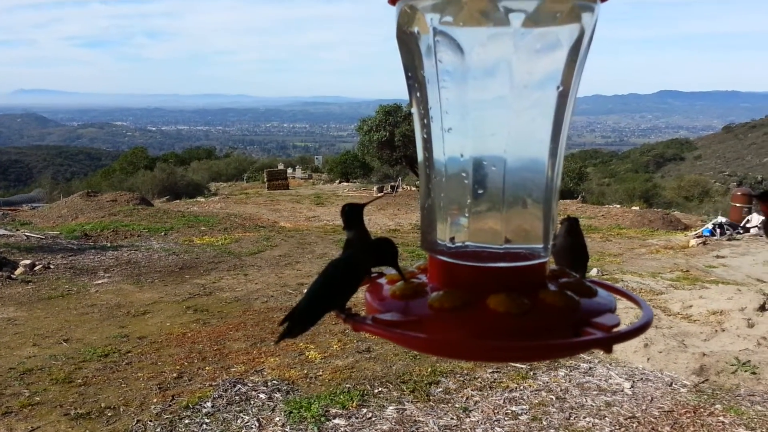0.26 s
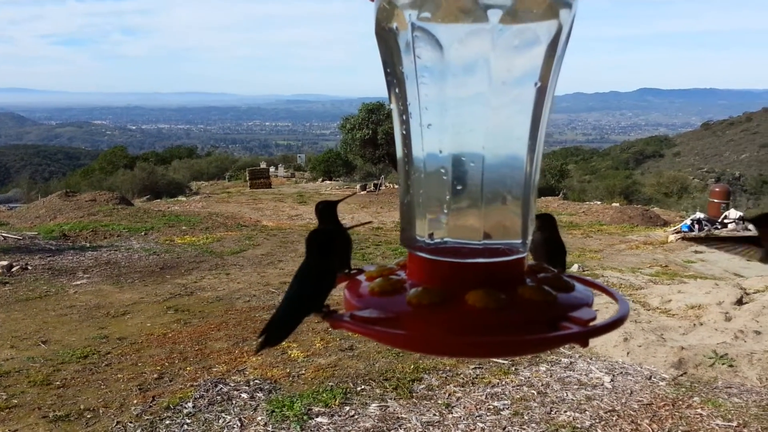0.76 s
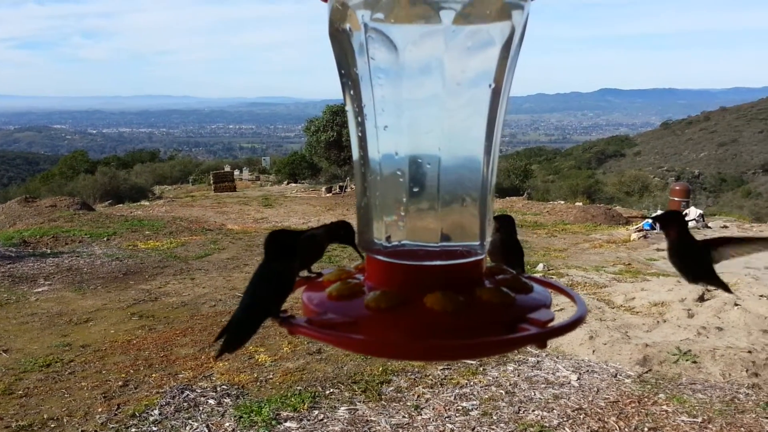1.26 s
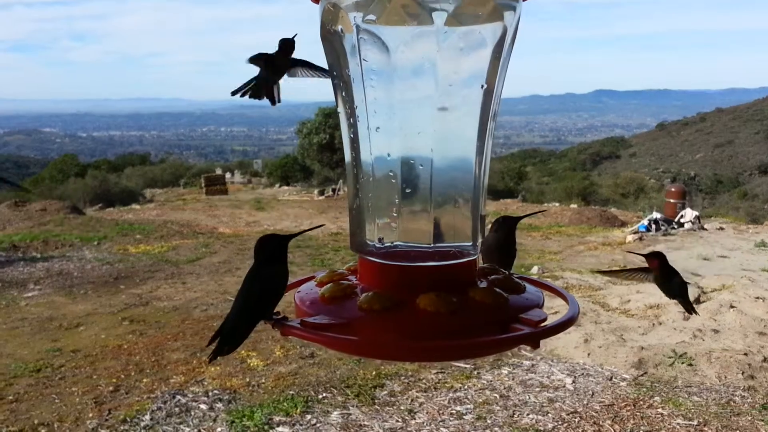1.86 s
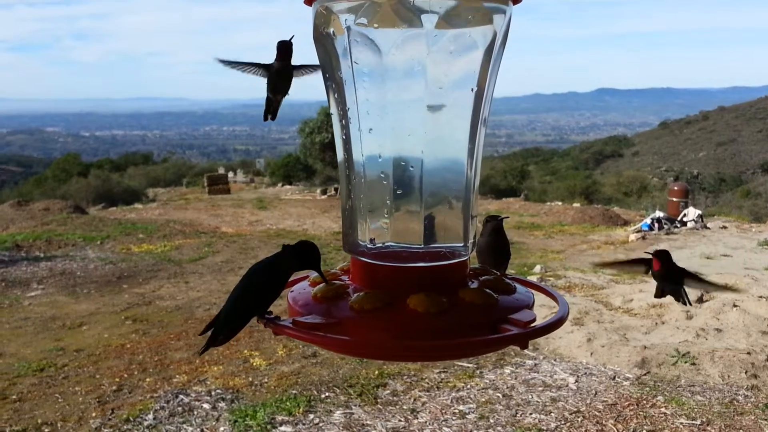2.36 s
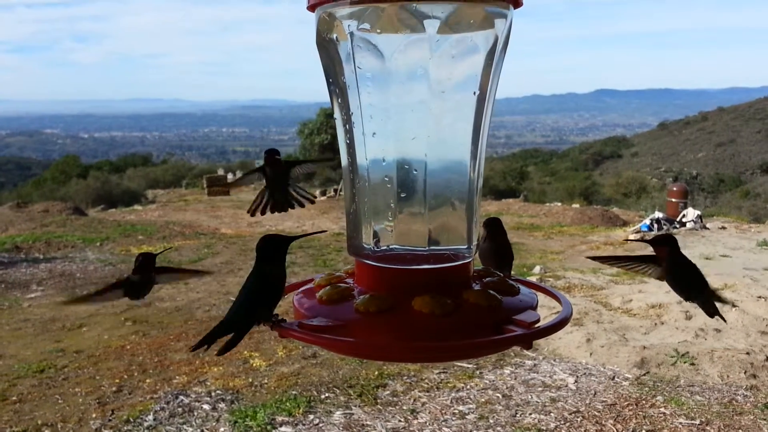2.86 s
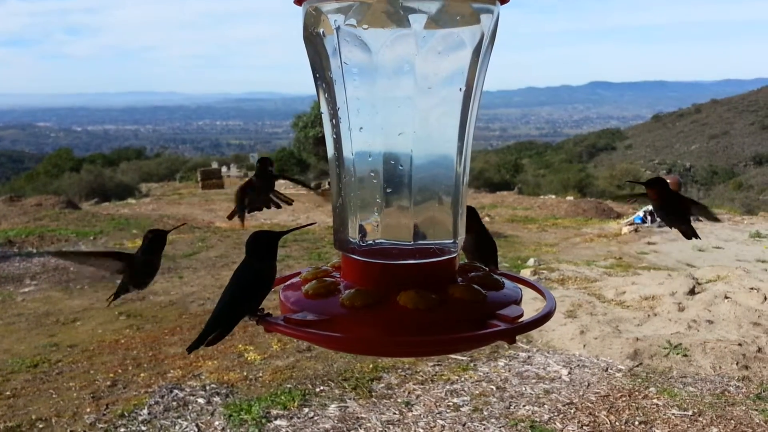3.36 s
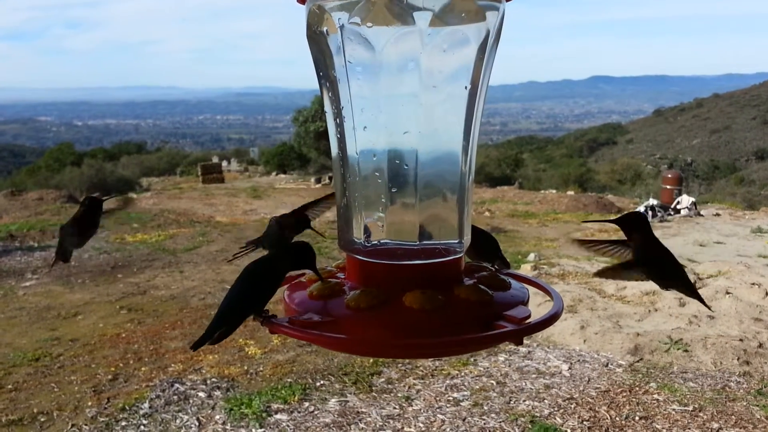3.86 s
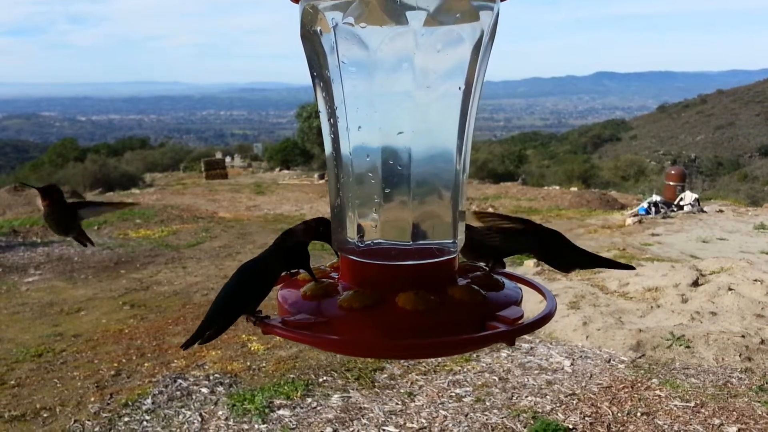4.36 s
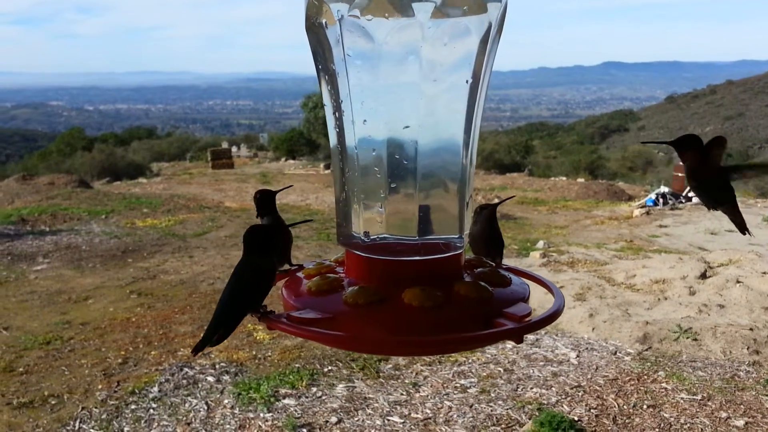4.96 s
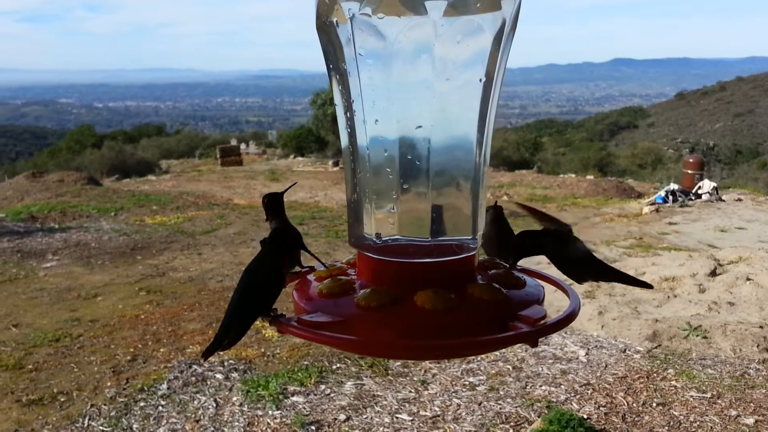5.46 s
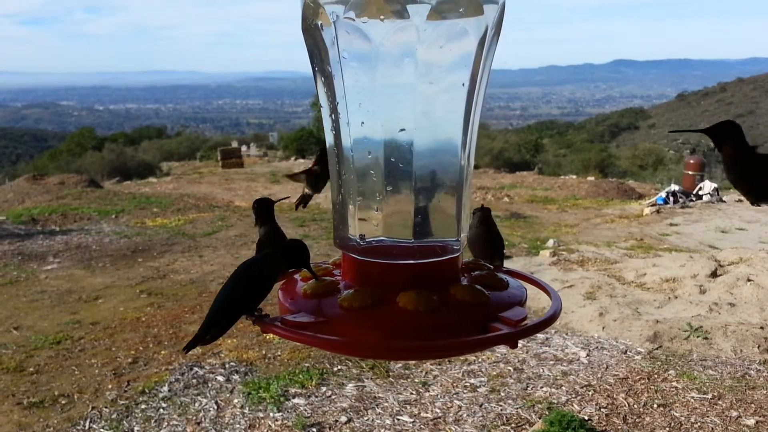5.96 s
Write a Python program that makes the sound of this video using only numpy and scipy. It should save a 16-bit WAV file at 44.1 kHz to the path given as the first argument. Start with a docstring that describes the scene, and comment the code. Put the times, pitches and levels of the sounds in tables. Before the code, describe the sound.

Very close outdoors at a nectar feeder, several hummingbirds hover with a low, pulsing purr of wings. Loud, needle-sharp chips, each a tiny falling whistle with a brief echo, strike irregularly throughout, mixed with much fainter ones. Darting birds add quick, throaty wing flutters and feather rush. Faint scratchy hiss notes appear around two seconds, over quiet open air.

```python
"""Piercing chips burst out over the purr of wings: hummingbirds crowd a nectar feeder outdoors, close by.
Each chip is a whistle that plunges in about 10 ms and echoes off the feeder and nearby walls; a brief
low tone ends the first one. Two hovering birds hum as wingbeat harmonics at different rates; a darting
bird adds harder strokes and bands of noise for the rush of air in its feathers.
Scratchy notes of rattled hiss, a faint 3 kHz sine whistle and open air lie underneath."""
import sys
import numpy as np
from scipy import signal
from scipy.fft import rfft, irfft, next_fast_len
from scipy.io import wavfile
from scipy.ndimage import map_coordinates

SR = 44100
rng = np.random.default_rng(int(sys.argv[2]) if len(sys.argv) > 2 else 0)


def pcm_store(signal):
    """Save signal as 16-bit PCM."""
    levels = np.round(np.clip(np.atleast_2d(signal), -1, 1) * 32767)
    wavfile.write(sys.argv[1], SR, levels.astype(np.int16).T)


N = 273420

# Open air. Each row: frequency in Hz, relative density in dB per Hz.
AIR_SPECTRUM = [(20, -46), (30, -36), (45, -19), (60, -5), (90, -9), (114, 0.5), (166, -10.5), (349, -17.5),
                (600, -24), (934, -26.5), (4260, -47.5), (7650, -52), (14500, -47.5)]
DRONE_HZ, DRONE_DB = 343.5, -61

# Hum of a hovering bird. Each row: frequency in Hz, relative level of a wingbeat harmonic there in dB.
HUM_SPECTRUM = [(30, -34), (50, -18.5), (78, -10), (100, 2.5), (125, -1.5), (170, -9), (260, -10.5),
                (500, -33.5), (1000, -73)]
# Nearness of the hovering birds. Each row: time in seconds, hum level in dB before a common trim.
NEARNESS = [(0.08, -52), (0.28, -45), (1.05, -52.5), (1.3, -47.5), (1.85, -42.5), (2.3, -48), (3.45, -46.5),
            (3.95, -41.5), (4.2, -47.5), (4.62, -43.5), (5.4, -48), (5.8, -46.5), (6.2, -43)]
# Wingbeats of the two hovering birds. Each row: time in seconds, beats per second.
QUICK_BEATS = [(0, 50.5), (1.2, 47), (1.9, 52.5), (3.7, 47), (4.3, 54), (4.8, 49), (6.2, 51)]
SLOW_BEATS = [(0, 39.46), (0.55, 39.5), (1.2, 43.17), (2.3, 40.33), (3.5, 38.4), (3.8, 42.84), (5.2, 44.7),
              (6.2, 42.36)]

# The brief low tone that ends the first chip, then a faint 3 kHz whistle. Each row: start in seconds,
# length in seconds, level in dB, pitch at both ends in Hz, rise to the middle in Hz.
ARCHED_TONES = [(0.136, 0.0052, -40, 1900, 450), (0.594, 0.1, -58.5, 2910, 246)]
# Scratchy notes between the chips. Each row: start in seconds, length in seconds, level in dB,
# centre of the band in Hz.
RASP_NOTES = [(2.097, 0.21, -54, 7050), (2.211, 0.081, -52, 7100), (2.348, 0.086, -50, 7030),
              (2.781, 0.13, -54.5, 5420), (2.86, 0.097, -56, 5800)]

# Wing push of the darting bird, for both strokes and eddies. Each row: frequency in Hz, relative level in dB.
PUSH_SPECTRUM = [(20, -29), (35, -21), (55, -9), (120, -3), (210, 3.5), (300, -3.5), (450, -8.5),
                 (700, -19.5), (1200, -34.5), (3000, -61)]
# Air through the wing feathers. Each row: frequency in Hz, relative density in dB per Hz.
SWISH_SPECTRUM = [(200, -30), (500, -7.5), (800, -2), (1300, -2), (2500, -7), (5000, -16.5), (9000, -8),
                  (14000, -17)]
# Rush of the fanned tail. Each row: frequency in Hz, relative density in dB per Hz.
TAIL_SPECTRUM = [(1000, -8), (3000, -18.5), (5000, -3), (6500, -1), (9000, -8), (14000, -19)]
# Darts and sharp turns. Each row: middle in seconds, half length in seconds, then the levels in dB,
# before the mix trims, of wing push, feather swish and fanned tail.
TURNS = [(0.122, .02, -45.5, -62, -70.5), (0.597, .025, -44.5, -61.5, -63),
         (0.734, .035, -39.5, -57.5, -61.5), (1.31, .05, -43.5, -60, -75.5),
         (1.612, 0.032, -38.5, -60.5, -45), (1.694, .055, -36.5, -51.5, -53), (1.806, 0.022, -42, -45, -59),
         (1.944, .035, -47.5, -62.5, -58), (2.486, .025, -41, -51, -53.5),
         (2.617, .04, -37.5, -54.5, -69.5), (2.841, .05, -35.5, -52.5, -46.5),
         (3.148, .03, -46, -59.5, -57), (3.25, 0.02, -39.5, -56, -53.5), (3.354, .025, -48.5, -57.5, -74.5),
         (3.772, .17, -44, -56.5, -69.5), (4.585, .06, -42, -56.5, -51.5), (4.827, 0.06, -46.5, -61, -61.5),
         (5.332, .045, -43.5, -55.5, -72), (5.491, .04, -46, -61, -64), (5.717, 0.023, -40, -54, -51.5),
         (5.811, .03, -36.5, -57, -52)]
TURN_EDGE = 1.8  # exponent: 2 is a bell-shaped swell, less is more pointed
CRUISE_PUSH_DB, CRUISE_SWISH_DB = -53, -67.5  # between turns, before the mix trims
CRUISE_HZ = 49.48  # beats per second between turns
EFFORT_HZ_PER_DB = -0.35  # harder strokes come more slowly

# Chips. Each row: start in seconds, level in dB before a slight trim, starting pitch in Hz,
# nominal length in seconds, boost of the low ending in dB, boost of the octave in dB before a trim,
# left over right level in dB, phase lead of left over right in radians.
CHIP_CALLS = [(0.122, -0.5, 9010, 0.012, 4, 3.5, -4.5, 3), (0.6028, -0.55, 8875, 0.015, -4, -0.5, -3, 3),
              (0.795, -23, 9620, 0.0088, 6, 6.5, -6, -1), (1.189, -1, 8746, 0.012, -2, 2, 1.5, -0.7),
              (1.349, -29, 9120, 0.0056, 9, 4, -8.5, -1.1),
              (1.771, -1.5, 9020, 0.013, 4.5, 1.5, -3.5, -1.5), (1.94, -22, 8930, 0.0087, 7.5, 2, -4.5, 2),
              (2.1525, -4, 9090, 0.013, -2.5, 5, -2, -0.5),
              (2.4605, -1.5, 9050, 0.011, -1.5, 4.5, 0, -0.65),
              (2.537, -3.5, 8600.0, 0.012, 0, 3, -3.5, -1), (2.653, -20.0, 9140, 0.01, 3.5, 4, -8.5, 2),
              (2.708, -31, 7220, 0.009, 12.5, 13, -3, 3), (3.157, -29, 8290, 0.0047, 0.5, 6, -8, -1.3),
              (3.273, -1.5, 9184, 0.016, 2.5, 2, -2.5, -2), (3.477, -24, 7760, 0.0044, 16, 10.5, -2, 3.5),
              (3.589, -23, 8290, 0.0056, -3, 5, -3, 0), (3.6986, -1.0, 9170, 0.014, -4.5, 0, -0.5, -1.5),
              (3.7927, -4, 8430, 0.0098, 3, 5, -4.5, -0.5),
              (3.938, -27.5, 8670, 0.0065, 19, 18.5, -1, -0.3),
              (4.259, -34.5, 8570, 0.0082, 9, 5.5, -4, 3.5), (4.6337, -2, 8830, 0.012, 1.5, 4, -7.5, 2.5),
              (4.7397, -21.5, 8880, 0.0066, 7, 8, -7, -1), (5.176, -4.5, 9270, 0.0105, 8, 3.5, 1.5, -0.5),
              (5.291, -6, 8930, 0.013, 8, 7, 3, -0.4), (5.4568, -26, 8480, 0.005, 7, 4, 3.5, 3)]
# Course of one chip. Each row: share of its nominal length, fundamental in dB, octave in dB before boosts.
CHIP_COURSE = [(-.3, -48.5, -75.5), (-.05, -41, -61), (0.077, -19, -63.5), (0.349, -8.5, -53.5),
               (.6, -2.5, -35.5), (0.802, -7, -23.5), (0.999, -29.5, -24), (1.202, -48, -49)]
# Nearby surfaces. Each row: typical echo delay in seconds, echo level in dB.
WALLS = [(.0013, -10.5), (.0028, -15.5), (.0058, -13), (0.012, -16.5)]
# Diffuse tail. Each row: frequency in Hz, time to decay by 60 dB in seconds.
YARD_DECAY = [(300, .2), (4000, 0.36), (7500, 0.19), (10500, 0.28), (13000, 0.26)]

# Resonances of the two microphone ports. Each row: frequency in Hz, left gain in dB, right gain in dB,
# phase lead of left over right in radians.
PORTS = [(100, 0.85, 0.32, 0.5), (2550, 2.5, 0.5, 1.08), (4600, 5, 0, -1.45), (6350, 0.5, -6.5, -0.57),
         (6840, -0.5, -0.5, -2.13), (7700, -1.5, 5, -0.72), (8270, -5, 5.5, -0.05), (9200, 2.5, -0.5, 2.5),
         (10000, -1, 4.5, 1.5), (11000, 1, 1.5, 3), (14460, 3, 2, 3)]
TOP_HZ = 14700  # upper band limit


def amp(db):
    """Decibels to gain."""
    return 10 ** (np.asarray(db) / 20)


def unit(x):
    """Scale to rms 1."""
    return x / np.sqrt(np.mean(x ** 2) + 1e-20)


def along(points, hz):
    """Read (Hz, value) points along a log frequency axis."""
    f, v = np.transpose(points)
    return np.interp(np.log(hz + 1), np.log(f + 1), v)


def curve(rows):
    """Draw (seconds, value) points as one value per sample."""
    s, values = np.transpose(rows)
    return np.interp(np.arange(N) / SR, s, values)


def wobble(rate):
    """A smooth random curve through `rate` knots a second."""
    knots = rng.standard_normal(int(N * rate / SR) + 4)
    fine = np.arange(0, len(knots) - 1, .1)
    smooth = map_coordinates(knots, [fine])
    return np.interp(np.arange(N) * rate / SR, fine, smooth)


def filtered(x, response):
    """Shape x by a response of frequency."""
    m = next_fast_len(N + SR // 2)
    return irfft(rfft(x, m) * response(np.fft.rfftfreq(m, 1 / SR)), m)[..., :N]


def panned(left_db):
    """Left and right gains of unit mean power, left_db apart."""
    return unit(amp(np.array([[left_db], [-left_db]]) / 2))


def noise(spectrum, side_db):
    """Coloured stereo noise of rms 1; more side makes it wider."""
    mid, side = filtered(rng.standard_normal((2, N)), lambda hz: amp(along(spectrum, hz)))
    side = amp(side_db) * side
    return unit(np.array([mid + side, mid - side]))


def beat_phase(rate_hz, unsteady):
    """Phase in radians of a slightly unsteady beat."""
    cycles = np.cumsum(rate_hz * (1 + unsteady * wobble(14))) / SR
    return 2 * np.pi * (cycles + rng.random())


def wing_tone(rate_hz, spectrum, unsteady, flutter_db, spread, count=18):
    """Wingbeat harmonics, each wavering in level; a small phase spread (radians) makes sharp strokes."""
    phase = beat_phase(rate_hz, unsteady)
    mean_hz = np.mean(rate_hz)
    tone = np.zeros(N)
    for k in range(1, count + 1):
        level_db = along(spectrum, k * mean_hz) + flutter_db * wobble(9)
        tone += amp(level_db) * np.cos(k * phase + spread * rng.standard_normal())
    return unit(tone), phase


def background():
    """Open air as gently drifting low noise, a thin hiss and a faint drone wavering in level."""
    air = amp(-54.0 + wobble(7)) * noise(AIR_SPECTRUM, side_db=-10.5)
    hiss_spectrum = [(500, -8), (3000, -5.0), (7500, -11), (10000, 1), (14000, 3.0)]  # Hz, dB per Hz
    hiss = amp(-72.0) * noise(hiss_spectrum, side_db=5.0)
    drone = amp(DRONE_DB + 3 * wobble(2)) * np.sin(beat_phase(DRONE_HZ, unsteady=.004))
    return air + hiss + drone


def hovering():
    """Two birds hang by the feeder; their hums beat against each other and swell as they shift about."""
    hum_db = curve(NEARNESS) + 1.6 * wobble(14)
    quick, _ = wing_tone(curve(QUICK_BEATS), HUM_SPECTRUM, unsteady=.03, flutter_db=3.0, spread=1.5)
    slow, _ = wing_tone(curve(SLOW_BEATS), HUM_SPECTRUM, unsteady=.025, flutter_db=0.55, spread=1.8)
    return amp(hum_db - 2.5) * (quick * panned(.9) + slow * panned(-.4))


def arched_tones():
    """The first chip's low end tone and the 3 kHz whistle: sines that rise and sink in pitch and level."""
    out = np.zeros(N)
    for s, length, db, base_hz, rise_hz in ARCHED_TONES:
        arch = np.sin(np.pi * np.clip((np.arange(N) / SR - s) / length, 0, 1))
        phase = 2 * np.pi * np.cumsum(base_hz + rise_hz * arch) / SR
        out += amp(db) * np.sqrt(np.abs(arch)) * np.sin(phase)
    return out


def rasps(width_hz=1700):
    """Soft scratchy notes: a band of hiss chopped by a fast rattle of the syrinx."""
    t, out = np.arange(N) / SR, np.zeros((2, N))
    rattle = unit(amp(3.6 * np.cos(beat_phase(1200, unsteady=.12))))
    for s, length, db, centre_hz in RASP_NOTES:
        band = filtered(rng.standard_normal((2, N)),
                        lambda hz: 1 / (1 + (np.abs(hz - centre_hz) / width_hz) ** 4))
        # a quiet remnant of each band stays on outside its note
        swell = np.interp((t - s) / length, [0, .12, .6, 1.15], [0.081, 1.0, 1.0, 0.081])
        out += amp(db) * swell * rattle * unit(band)
    return out


def darting():
    """In every turn the wings beat harder and slower, and air rushes through the feathers on each stroke."""
    middle, width, *levels_db = np.transpose(TURNS)
    distance = np.abs((np.arange(N) / SR - middle[:, None]) / width[:, None])
    swells = np.exp(-distance ** TURN_EDGE)
    push_power, swish_power, tail_power = amp(levels_db) ** 2 @ swells
    push = np.sqrt(amp(CRUISE_PUSH_DB) ** 2 + push_power)
    swish = np.sqrt(amp(CRUISE_SWISH_DB) ** 2 + swish_power)

    effort_db = 20 * np.log10(push) - CRUISE_PUSH_DB
    rate_hz = CRUISE_HZ + EFFORT_HZ_PER_DB * effort_db
    tone, phase = wing_tone(rate_hz, PUSH_SPECTRUM, unsteady=0.032, flutter_db=3.0, spread=0.9)
    force = unit(amp(1.1 * wobble(30)))  # strokes differ in force as the bird steers
    # feathers rustle unevenly within a stroke
    stroke = unit(force * amp(1.6 * np.cos(phase) + 2.3 * wobble(170)))

    beats = amp(-3.0) * push * force * tone * panned(1.8)
    eddies = amp(-4.5) * push * noise(PUSH_SPECTRUM, side_db=-13.5) * panned(2.5)
    wing_feathers = swish * noise(SWISH_SPECTRUM, side_db=2.5) * panned(4)
    fanned_tail = np.sqrt(tail_power) * noise(TAIL_SPECTRUM, side_db=-3.5)
    return beats + stroke * (eddies + wing_feathers + fanned_tail)


def breath(order, edges_hz, kind, count):
    """Filtered stereo noise, independent left and right, to roughen a chip."""
    sos = signal.butter(order, edges_hz, kind, fs=SR, output="sos")
    return signal.sosfilt(sos, rng.standard_normal((2, SR // 10)))[:, :count]


def chip(start_hz, length, ending_db, bright_db, lead, end_hz=4200, bend=2.14, rough_db=-2,
         break_db=3.5, break_hz=1100, hiss_db=-32):
    """A slightly hissy whistle creeps in, then falls ever faster; low down it breaks up over a rough octave."""
    share, first_db, octave_db = np.transpose(CHIP_COURSE)
    u = np.arange(share[0], share[-1], 1 / (length * SR))
    pitch_hz = start_hz - (start_hz - end_hz) * np.maximum(u, 0) ** bend
    phase = 2 * np.pi * np.cumsum(pitch_hz) / SR
    ports = np.array([[lead], [-lead]]) / 2

    # random level breaks fade in toward the low ending
    breaks = map_coordinates(rng.standard_normal(size=64), [np.arange(len(u)) * break_hz / SR])
    low_db = (ending_db + break_db * breaks) * np.clip((u - .6) / 0.37, 0, 1)
    hiss = amp(hiss_db) * breath(3, [4300, 10500], "band", len(u))
    first = amp(np.interp(u, share, first_db) + low_db) * (np.sin(phase + ports) + hiss)
    rasp = amp(rough_db) * breath(2, 7000, "high", len(u))
    octave = amp(np.interp(u, share, octave_db) + bright_db - 2) * (np.sin(2 * phase + ports) + rasp)
    return (first + octave) * signal.windows.tukey(len(u), .1)


def echoes(tail_db, scatter_db, scatter_t60):
    """A fresh answer of the surroundings: single walls, quick scatter off the feeder, a diffuse tail."""
    hz, t, z = signal.stft(rng.standard_normal((2, SR // 3)), SR, nperseg=256)
    decay = amp(-60 * t / along(YARD_DECAY, hz)[:, None])
    tail = signal.istft(z * decay, SR, nperseg=256)[1]
    t = np.arange(tail.shape[1]) / SR
    tail = tail * (1 - np.exp(-t / 0.0058))
    scatter = rng.standard_normal(tail.shape) * amp(-60 * t / scatter_t60) * (1 - np.exp(-t / 0.006))
    answer = amp(tail_db) * tail / np.linalg.norm(tail[0])
    answer += amp(scatter_db) * scatter / np.linalg.norm(scatter[0])
    for delay, db in WALLS:
        # the paths change with the bird's place and differ a little between the ports
        path = delay * np.exp(0.056 * rng.standard_normal()) + 0.000099 * rng.random(2)
        answer[[0, 1], (path * SR).astype(int)] += amp(db)
    return answer


def chips():
    """Each chip reaches the microphone directly and by way of the surroundings."""
    out = np.zeros((2, N + SR))
    for s, db, start_hz, length, ending_db, bright_db, left_db, lead in CHIP_CALLS:
        call = amp(db - 0.21) * chip(start_hz, length, ending_db, bright_db, lead)
        surroundings = echoes(tail_db=-15.5, scatter_db=-14.5, scatter_t60=0.097)
        wet = signal.fftconvolve(call, surroundings, axes=1)
        i = round((s + CHIP_COURSE[0][0] * length) * SR)  # the creep-in comes before the start
        out[:, i:i + call.shape[1]] += call * panned(left_db)
        out[:, i:i + wet.shape[1]] += wet
    return out[:, :N]


def scene():
    """Open air, wings and calls together."""
    return background() + hovering() + arched_tones() + rasps() + darting() + chips()


def port_colour(hz):
    """The two microphone ports resonate at different pitches, each with its own gain and phase."""
    f, *columns = np.transpose(PORTS)
    left_db, right_db, lead = [np.interp(hz, f, c) for c in columns]
    return amp([left_db, right_db]) * np.exp(.5j * np.array([lead, -lead]))


def record(dry):
    """The ports colour the sound, peaks clip at full scale, a steep low-pass cuts above the band limit."""
    heard = np.clip(filtered(dry, port_colour), -1, 1)
    return filtered(heard, lambda hz: 1 / (1 + (hz / TOP_HZ) ** 120))


dry = scene()
out = record(dry)
pcm_store(out)
```